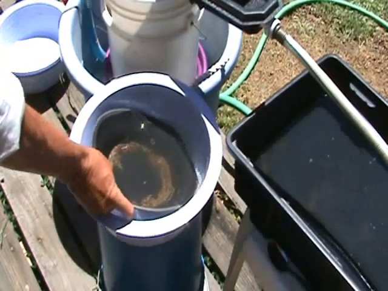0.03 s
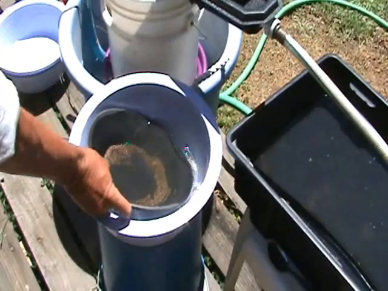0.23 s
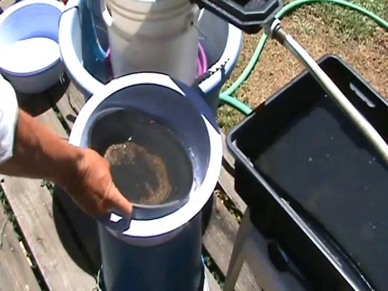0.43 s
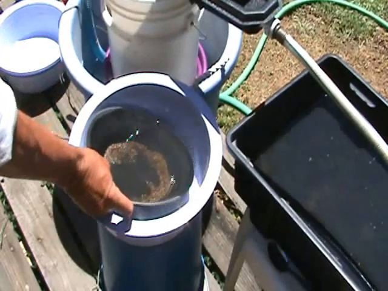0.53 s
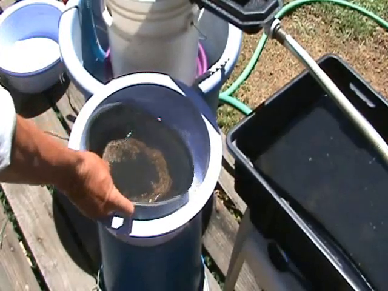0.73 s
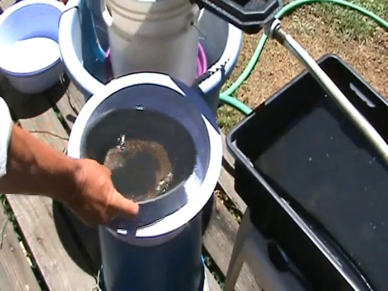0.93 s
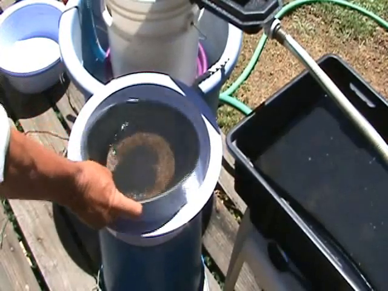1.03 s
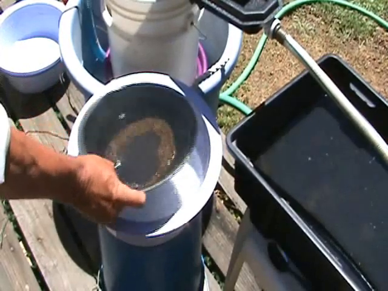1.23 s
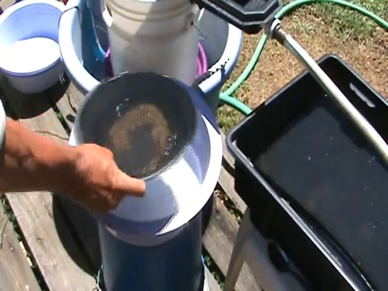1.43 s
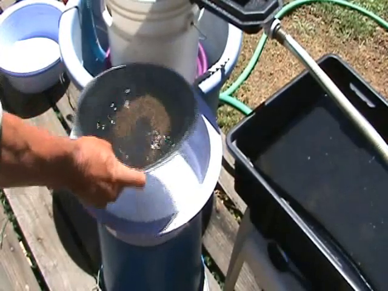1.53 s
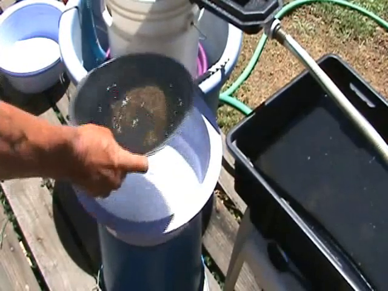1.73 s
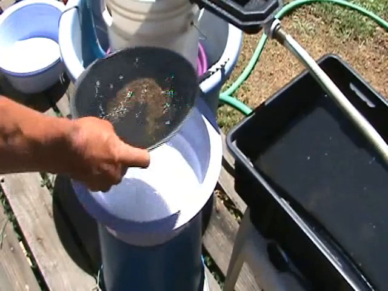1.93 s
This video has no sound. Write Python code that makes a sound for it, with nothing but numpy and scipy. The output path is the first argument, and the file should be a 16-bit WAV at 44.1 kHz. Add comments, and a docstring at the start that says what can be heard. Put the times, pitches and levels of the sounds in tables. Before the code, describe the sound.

Water laps, drips and splashes softly in a pan swirled over a bucket in a yard. A songbird close on the right whistles quick gliding notes, the pan knocks lightly twice, and a hollow thud comes near the end.

```python
"""Panning sand over a bucket

A pan of water and sand is swirled and lifted in a back yard: bubbles ring as the water laps, drips and
splashes, and the pan twice nudges the bucket. A songbird whistles gliding notes close by on the right,
with fainter birds behind it. Something hollow thuds near the end, over a low rumble and faint mains hum."""
import sys
import numpy as np
from scipy import signal
from scipy.fft import rfft, irfft
from scipy.io import wavfile
from scipy.ndimage import uniform_filter1d

SR = 44100
rng = np.random.default_rng(int(sys.argv[2]) if len(sys.argv) > 2 else 0)


def unload_audio(sound):
    """Save the sound as a 16-bit wav file, at the path given as the first command line argument."""
    columns = np.transpose(np.atleast_2d(sound))
    # keep every value between -1 and 1, then stretch to whole-number steps
    steps = np.round(np.clip(columns, -1, 1) * 32767)
    wavfile.write(sys.argv[1], SR, steps.astype(np.int16))


N = 88200
TIME = np.arange(N) / SR
CUTOFF_HZ = 15250


def water():
    """Bubble resonance: large bubbles lap and gurgle, small ones fizz; the bucket reverberates briefly."""
    # how hard the water laps and sprays: time_s, lap_db, spray_db
    slosh = [(0, -58, -58), (.2, -59, -71), (.39, -52, -61.5), (.55, -60, -67.5), (.9, -61, -61.5),
             (.98, -55, -54), (1.02, -50, -51), (1.16, -62, -64), (1.3, -60.5, -65), (1.42, -65.5, -65.5),
             (1.45, -55, -60), (1.5, -64.5, -68), (2.0, -66, -68.5)]
    time_s, lap_db, spray_db = np.transpose(slosh)
    lap_gain = from_db(np.interp(TIME, time_s, lap_db))
    spray_gain = from_db(np.interp(TIME, time_s, spray_db))
    lap = lap_gain * bubbles(per_s=1300, band_hz=(481, 2900), cycles=5.9, spread_db=3.5, width_db=10)
    spray = spray_gain * bubbles(per_s=2100, band_hz=(2800, 11170), cycles=53, spread_db=5.5)
    gurgle = lap_gain * bubbles(per_s=490, band_hz=(883, 3360), cycles=25, spread_db=6, width_db=6)
    # a wave breaks on the side of the pan into fine spray
    splash = from_db(-51.5) * burst(start_s=1.005, attack_s=.011, t60_s=.44) * hiss(low_hz=1980)
    direct = lap + from_db(-3) * gurgle + spray + splash + panned(drops(), pan_db=-3)
    direct = signal.sosfilt(signal.butter(12, 10800, fs=SR, output="sos"), direct)
    return direct + from_db(-12) * echoes(direct.mean(0), t60_s=.18, correlation=.98)


def bubbles(per_s, band_hz, cycles, spread_db, width_db=0):
    """Damped resonators excited at random: each bubble falls 60 dB in `cycles` periods; rms 1."""
    strengths = from_db(spread_db * np.minimum(rng.exponential(1, N), 3.5))
    births = strengths * rng.choice([-1, 1], N) * (rng.random(N) < per_s / SR)
    pitches_hz = np.geomspace(*band_hz, 30)
    pitch_index = rng.integers(0, len(pitches_hz), N)
    out = 0
    for k, hz in enumerate(pitches_hz):
        radius = from_db(-60 * hz / (cycles * SR))
        resonator = [1, -2 * radius * np.cos(2 * np.pi * hz / SR), radius ** 2]
        ringing = signal.lfilter([1, 0, -1], resonator, births * (pitch_index == k) + 1e-18)
        out = out + panned(ringing, width_db * rng.standard_normal())
    return rms_one(out)


def drops():
    """Impact and resonance: a drop snaps on the surface and rings a bubble whose pitch rises as it dies."""
    # drops and bubbles in the pan: start_s, level_db, pitch_hz, t60_cycles
    impacts = [(0.027, -42, 7500, 20), (.08, -34, 3870, 20), (0.085, -45, 1560, 72),
               (0.11, -41.5, 3134, 170), (.117, -38.5, 6960, 11), (0.127, -31, 1070, 6.1),
               (0.127, -36, 3700, 21), (0.146, -41, 7300, 8.4), (0.173, -39, 1110, 10),
               (.244, -34, 5020, 17), (.244, -35, 1470, 5.8), (0.257, -51, 6900, 520),
               (.296, -34, 620, 5.4), (.327, -39, 2194, 106), (.328, -39.5, 790, 14),
               (0.374, -40.5, 1320, 18), (0.39, -38, 4070, 32), (0.403, -42, 1850, 35),
               (0.452, -39, 6400, 8.8), (0.459, -36, 3400, 23), (0.481, -41, 8760, 35),
               (.497, -35, 7280, 35), (.523, -34.5, 4700, 25), (0.622, -33.5, 5730, 16),
               (.682, -39, 6040, 18), (0.864, -37, 4900, 24), (0.951, -33.5, 9300, 30),
               (.957, -50, 9000, 26), (0.97, -42, 1815, 95), (0.977, -43, 6600, 83), (1.003, -31, 7500, 13),
               (1.01, -37, 1800, 28), (1.011, -21, 5850, 7.3), (1.0142, -22.5, 7050, 20),
               (1.027, -43, 5700, 20), (1.033, -31, 1700, 24), (1.047, -37.5, 1000, 31),
               (1.104, -32, 6070, 71), (1.122, -39.5, 4800, 61), (1.1568, -33.5, 5730, 17),
               (1.24, -30, 5300, 15), (1.243, -37.5, 7700, 26), (1.462, -43.5, 4380, 120),
               (1.661, -47.5, 8300, 30)]
    pitch_rise, onset_cycles, snap_decay_s = .063, .61, .0034
    out = np.zeros(N + SR)
    t = TIME[:SR // 10]
    for start_s, level_db, hz, t60_cycles in impacts:
        life = t * hz / t60_cycles
        glide_hz = hz * (1 + pitch_rise * np.minimum(life, 1))
        envelope = from_db(-60 * life) * (1 - np.exp(-t * hz / onset_cycles))
        bubble = envelope * np.sin(2 * np.pi * np.cumsum(glide_hz) / SR)
        band = signal.butter(2, [hz * .73, hz * 1.286], "band", fs=SR, output="sos")
        snap = rms_one(signal.sosfilt(band, rng.standard_normal(len(t)))) * np.exp(-t / snap_decay_s)
        start = int(start_s * SR)
        out[start:start + len(t)] += from_db(level_db) * (bubble + from_db(-12.5) * snap)
    return out[:N]


def knocks():
    """Impact excitation: grit crunches between the rims, then the bucket's modes give a dull knock."""
    # the pan nudges the bucket: start_s, level_db
    nudges = [(0.3243, -44.5), (1.4432, -40)]
    # modes of the bucket: pitch_hz, relative_db, t60_s
    modes = [(120, -2, 0.1), (850, -11, 0.028), (1090, -1.5, 0.012), (1326, 1.5, 0.031)]
    lag_s = .00312
    out = 0
    for start_s, level_db in nudges:
        age = np.maximum(TIME - start_s - lag_s, 0)
        body = sum(from_db(db - 60 * age / t60) * np.sin(2 * np.pi * hz * age) for hz, db, t60 in modes)
        grit = from_db(-3.5) * burst(start_s, attack_s=.00079, t60_s=.033) * hiss(low_hz=2500)
        out = out + from_db(level_db) * (body + grit)
    return out


def birds():
    """Direct and reflected song: nearby surfaces blur the notes, the yard returns a duller echo."""
    # the near songbird, one list per slurred note: time_s, pitch_hz, level_db
    song = [
        [(.462, 2300, -50), (.503, 2950, -55), (.515, 2460, -51), (.541, 2010, -62)],
        [(.597, 2230, -56.5), (.62, 2520, -47.5), (.65, 2950, -49.5), (.668, 2390, -47)],
        [(.679, 2800, -52), (.69, 3370, -41.5), (.715, 4040, -43), (.725, 4500, -53)],
        [(.726, 2650, -49), (.734, 3520, -40), (.741, 2770, -41.5)],
        [(.785, 3410, -46), (.799, 2330, -53), (.816, 2900, -40), (.823, 3850, -51.5), (.843, 2950, -40.5),
         (.875, 2280, -48)],
        [(.884, 2600, -52), (.895, 3250, -40.5), (.922, 3990, -33.5), (.935, 4440, -34)],
        [(.937, 2730, -52), (.945, 3620, -38), (.953, 2650, -52)],
        [(.996, 3627, -41.5), (1.007, 2757, -43), (1.031, 3783, -44), (1.048, 2827, -39.5),
         (1.065, 2424, -38.5), (1.087, 2300, -46)],
        [(1.095, 2340, -51), (1.108, 2642, -40.5), (1.12, 2750, -43.5), (1.133, 2550, -41)],
        [(1.353, 2240, -54.5), (1.39, 2179, -40), (1.399, 2300, -59)],
        [(1.399, 2710, -51.5), (1.414, 3106, -49)],
        [(1.411, 2150, -51), (1.425, 2590, -42.5), (1.45, 2300, -52.5), (1.48, 2292, -48)],
    ]
    # its closing flourish, one list per note: offset_s, pitch_hz, relative_db
    flourish = [
        [(0, 3700, -6), (.013, 2850, -4.5), (.026, 3500, 0.5), (.035, 3800, -0.5), (.05, 2850, -8),
         (.064, 3700, -6.5), (.078, 4150, -1), (.088, 4400, -7)],
        [(.09, 2750, -3), (.097, 3650, -2.5), (.106, 3050, -1.5), (.119, 2480, -6.5)],
    ]
    # the two times it sings the flourish: start_s, level_db
    entries = [(1.178, -37), (1.546, -44.5)]
    # thin whistles of farther birds, one list per note: time_s, pitch_hz, level_db
    far_notes = [
        [(.135, 3920, -63.5), (.285, 3420, -68)],
        [(.83, 3720, -49.5), (1.105, 3790, -54)],
        [(1.95, 5800, -65.5), (2.015, 4850, -53)],
    ]
    notes = song + [[(start_s + s, hz, level_db + db) for s, hz, db in note]
                    for start_s, level_db in entries for note in flourish]
    near = sum(whistle(note, waver_share=.0275, edge_s=.0015) for note in notes)
    far = sum(whistle(note, waver_share=.0052, edge_s=.025) for note in far_notes)
    dull = signal.sosfilt(signal.butter(6, 3550, fs=SR, output="sos"), near + far)
    yard_echo = from_db(-2.5) * echoes(dull, t60_s=.34, correlation=.78)
    blur = from_db(-3) * echoes(near + far, t60_s=.048, correlation=.78)
    far_echo = from_db(-10) * echoes(far, t60_s=.31, correlation=.17)
    return panned(near, -6.5) + panned(far + far_echo, -3) + panned(yard_echo + blur, -2.5)


def whistle(note, waver_share, edge_s):
    """Frequency and amplitude modulation: a gliding tone wavers at random, roughest on its low notes."""
    waver_reference_hz, flutter_db = 2300, 2
    time_s, hz, db = np.transpose(note)
    gate = np.clip(np.minimum(TIME - time_s[0], time_s[-1] - TIME) / edge_s + .5, 0, 1)
    pitch_hz = uniform_filter1d(np.interp(TIME, time_s, hz), size=130)
    waver = 1 + waver_share * (waver_reference_hz / pitch_hz) ** 1.775 * drift(corner_hz=180)
    level = from_db(np.interp(TIME, time_s, db) + flutter_db * drift(corner_hz=140))
    tone = np.sqrt(2) * np.sin(2 * np.pi * np.cumsum(pitch_hz * waver) / SR)
    return np.sin(np.pi / 2 * gate) ** 2 * level * tone


def thud():
    """Modal ringing: a soft blow on something hollow sounds low modes and a dull rattle."""
    # modes of the hollow body: pitch_hz, relative_db, t60_s (before the sag is added)
    modes = [(150, -16, .2), (206.6, -1, 0.22), (273.3, 4.5, 0.89), (373, -12, .12), (446, 2.5, 0.14),
             (559.4, 3.5, 0.12), (800, -6, 0.37), (1038, -10, .25)]
    # spectrum of the rattle: frequency_hz, relative_density_db
    rattle_spectrum = [(70, -20), (130, 2), (300, 7), (600, 7), (900, -5), (1400, -11), (2500, -33)]
    start_s, attack_s, hold_s, sag_db_per_s, rattle_t60_s = 1.639, .01, .11, 74, .46
    age = np.maximum(TIME - start_s, 0)
    dying = np.maximum(age - hold_s, 0)  # the level sags throughout, then falls faster after the hold
    body = sum(from_db(db - 60 * dying / t60) * np.sin(2 * np.pi * (hz * age + rng.random()))
               for hz, db, t60 in modes)
    rattle = from_db(-43 - 60 * dying / rattle_t60_s) * stereo_noise(rattle_spectrum)
    envelope = np.minimum(age / attack_s, 1) * from_db(-sag_db_per_s * age)
    return panned(envelope * (from_db(-50) * body + rattle), pan_db=1)


def yard():
    """Ambient noise: steady broadband rumble and hiss, with two faint harmonics of the mains."""
    # spectrum of the outdoor background: frequency_hz, relative_density_db
    spectrum = [(25, -4), (45, -5.5), (70, -2), (125, 1.5), (175, -1), (210, -8.5), (300, -9), (600, -11.5),
                (900, -16.5), (1300, -11), (2100, -16), (2900, -16.5), (3800, -23.5), (6000, -25.5),
                (10000, -29.5), (12500, -30.5), (15000, -41)]
    # mains hum: pitch_hz, rms_db
    harmonics = [(60, -63), (240, -63.5)]
    hum = sum(np.sqrt(2) * from_db(db) * np.sin(2 * np.pi * (hz * TIME + rng.random()))
              for hz, db in harmonics)
    return from_db(-51.5) * stereo_noise(spectrum) + hum


def echoes(x, t60_s, correlation):
    """Reverberation: scattered reflections from walls, deck and tubs decay exponentially; unit gain."""
    delay_s = .0045
    t = TIME[:SR // 2]
    mid, side = rng.standard_normal((2, len(t)))
    tail = left_right(mid, side, correlation) * from_db(-60 * t / t60_s) * (t > delay_s)
    return signal.fftconvolve(x[None], tail / np.sqrt(np.sum(tail ** 2) / 2), axes=1)[:, :N]


def stereo_noise(spectrum):
    """Partly coherent noise: alike in both ears in the bass and top treble, wide in between; rms 1."""
    # likeness of left and right: frequency_hz, correlation
    coherence = [(60, 1), (140, 1), (280, 0.8), (550, 0.68), (1100, 0.06), (3000, 0.067), (6000, 0.14),
                 (11000, 1)]
    hz = np.fft.rfftfreq(N, 1 / SR)
    mid, side = rfft(rng.standard_normal((2, N)))
    white = left_right(mid, side, at_hz(coherence, hz))
    return rms_one(irfft(from_db(at_hz(spectrum, hz)) * white, N))


def hiss(low_hz):
    """Superposition: countless tiny contacts merge into bright noise; rms 1."""
    band = signal.butter(4, [low_hz, 10100], "band", fs=SR, output="sos")
    return rms_one(signal.sosfilt(band, rng.standard_normal(N)))


def burst(start_s, attack_s, t60_s):
    """An envelope of linear rise and exponential decay."""
    age = np.maximum(TIME - start_s, 0)
    return np.minimum(age / attack_s, 1) * from_db(-60 * np.maximum(age - attack_s, 0) / t60_s)


def drift(corner_hz):
    """Random wander from low-passed noise; rms 1."""
    hop, settle = 40, 2000
    pole = np.exp(-2 * np.pi * corner_hz * hop / SR)
    noise = rng.standard_normal(N // hop + settle + 2)
    slow = signal.lfilter([1], [1, -2 * pole, pole ** 2], noise)[settle:]
    return np.interp(np.arange(N) / hop, np.arange(len(slow)), rms_one(slow))


def left_right(mid, side, correlation):
    """Sum and difference of two independent noises give a pair with the chosen correlation."""
    return np.sqrt(1 + correlation) * mid + np.sqrt(1 - correlation) * side * [[1], [-1]]


def panned(x, pan_db):
    """Interaural level difference: pan_db is left minus right."""
    return x * from_db(np.array([[.5], [-.5]]) * pan_db)


def at_hz(points, hz):
    """Interpolate on a log-frequency axis."""
    point_hz, value = np.transpose(points)
    return np.interp(np.log(hz + 1), np.log(point_hz), value)


def from_db(db):
    """Decibels to amplitude gain."""
    return 10 ** (np.asarray(db) / 20)


def rms_one(x):
    """Scale to unit rms."""
    return x / np.sqrt(np.mean(x ** 2) + 1e-20)


def scene():
    """Superposition of everything heard from above the bucket."""
    return birds() + water() + knocks() + thud() + yard()


def record(dry):
    """Band limiting: a steep low-pass filter cuts the top treble."""
    return signal.sosfilt(signal.ellip(12, .2, 80, CUTOFF_HZ, fs=SR, output="sos"), dry)


dry = scene()
out = record(dry)
unload_audio(out)
```